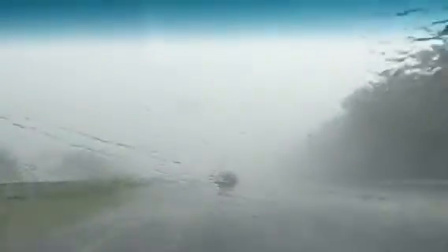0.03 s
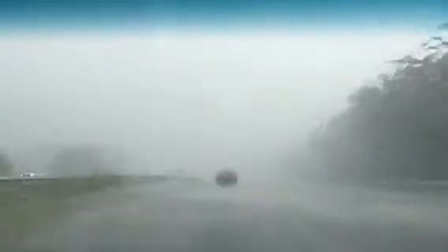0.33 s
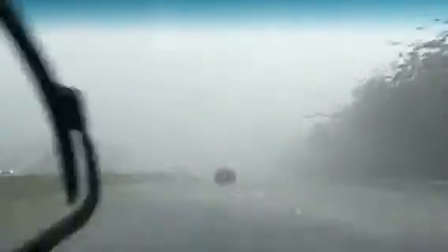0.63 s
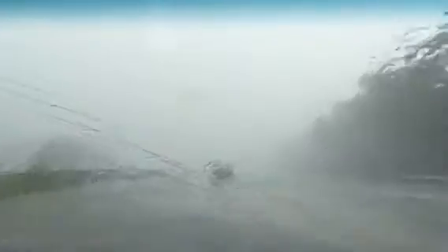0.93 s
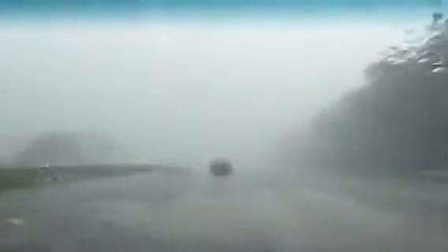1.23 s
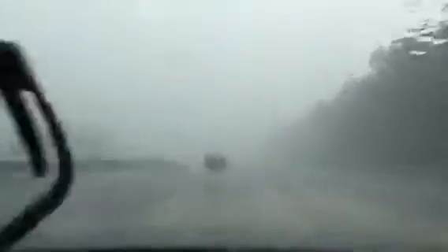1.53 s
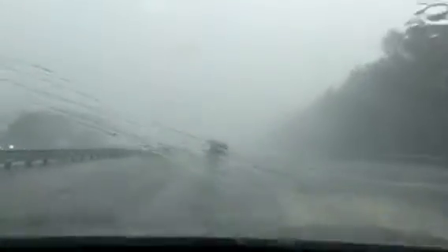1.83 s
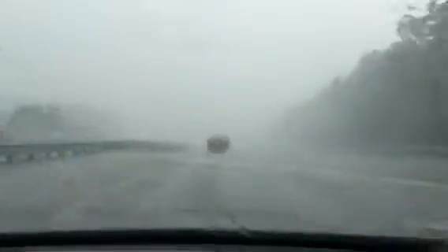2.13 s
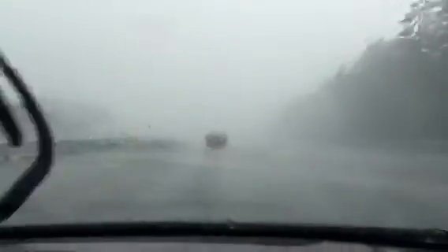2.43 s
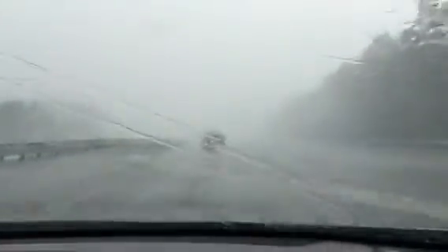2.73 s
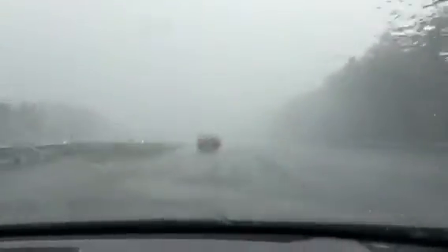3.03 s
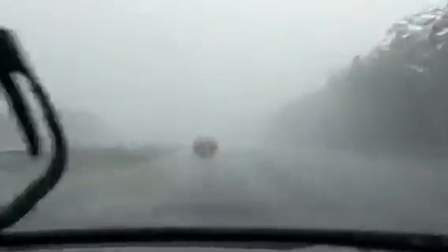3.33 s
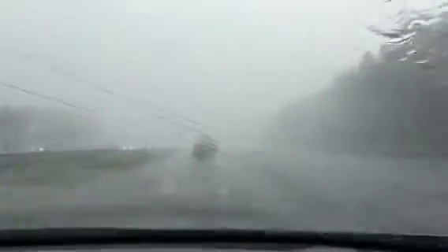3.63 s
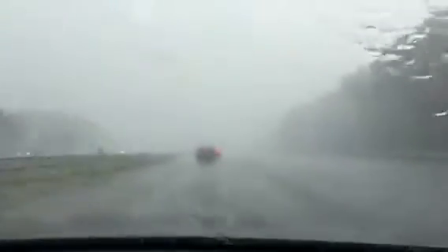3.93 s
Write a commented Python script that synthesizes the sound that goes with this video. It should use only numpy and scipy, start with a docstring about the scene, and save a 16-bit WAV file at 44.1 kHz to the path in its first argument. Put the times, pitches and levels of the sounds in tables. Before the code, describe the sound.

Hailstones and heavy rain strike a car, heard from inside over low tyre rumble.

```python
"""Inside a car driving through a hailstorm. From the start, fine rain patters over a wash of spray and
the road booms in the cabin. Hard stones crack on the windscreen, thickest in the first second, while
slush and heavy drops splatter on the glass and set the roof ringing. Bumps in the road thump between
1.2 and 1.5 s, a few tiny pellets tick from 2 to 2.7 s, and two more thumps come just before the end."""
import sys
import numpy as np
from scipy import signal
from scipy.io import wavfile

SR = 44100
rng = np.random.default_rng(int(sys.argv[2]) if len(sys.argv) > 2 else 0)


def transcribe(u):
    """Save the signal u as a 16-bit wav file named by the first command-line argument.

    u: samples, shape (n,) or (channels, n), limited to [-1, 1]; the rate is SR.
    q: integer samples, one column per channel.
    """
    v = np.clip(np.atleast_2d(u).T, -1, 1)
    q = np.round(v * 32767).astype(np.int16)
    wavfile.write(sys.argv[1], SR, q)


N = 176400
AGE = np.arange(SR // 3) / SR  # seconds since an impact
EDGES = np.geomspace(20, 17000, 27)  # filter bank, Hz
CENTRES = np.sqrt(EDGES[1:] * EDGES[:-1])
BANK = [signal.butter(2, band, "band", fs=SR, output="sos") for band in zip(EDGES, EDGES[1:])]

# bright tick of droplets and pellets on glass: pitch_hz, density_db
TICK_SPECTRUM = [(2000, -2), (4000, 9), (6000, 3), (9000, -1), (10500, -4), (12000, -5), (15000, -9)]
TICK_T60_S = 0.02


def from_db(db):
    """Decibels to gain."""
    return 10 ** (np.asarray(db) / 20)


def rms_one(x):
    """Scale to rms 1."""
    return x / np.sqrt(np.mean(x ** 2) + 1e-20)


def in_time(rows):
    """Each column of an automation curve at every sample."""
    times, *columns = np.transpose(rows)
    return [np.interp(np.arange(N) / SR, times, column) for column in columns]


def at_hz(points, hz):
    """Read a curve on a log-frequency axis."""
    pitches, values = np.transpose(points)
    return np.interp(np.log(hz), np.log(pitches), values)


def dying(age, t60):
    """Hold at 1 until age 0, then fall 60 dB every t60 seconds."""
    return np.exp(-np.log(1000) * np.maximum(age, 0) / t60)


def add(out, start_s, x):
    """Mix x into out from start_s."""
    i = int(np.clip(start_s * SR, 0, N - 1))
    out[i:i + len(x)] += x[:N - i]


def drift(per_s):
    """Glide between random values of spread 1."""
    knots = rng.standard_normal(400)
    return np.interp(np.arange(N) / SR * per_s, np.arange(len(knots)), knots)


def resonate(x, hz, t60):
    """A resonance with gain 1 at its peak."""
    radius = dying(1 / SR, t60)
    feedback = [1, -2 * radius * np.cos(2 * np.pi * hz / SR), radius ** 2]
    return signal.lfilter(np.array([1, 0, -1]) * (1 - radius ** 2) / 2, feedback, x)


def band_gains(spectrum):
    """Band gains that give white noise this spectrum at about the same power."""
    gains = from_db(at_hz(spectrum, CENTRES))
    return gains / np.sqrt(np.sum(gains ** 2 * np.diff(EDGES)) * 2 / SR)


def coloured(drives, gains):
    """Sum of the bands, each fed by its own drive."""
    return sum(gain * signal.sosfilt(sos, x + 1e-18) for sos, gain, x in zip(BANK, gains, drives))


def noise(spectrum, envelope=1):
    """Shaped noise at rms 1; neighbouring bands are unrelated."""
    white = rng.standard_normal((2, N)) * envelope
    return rms_one(coloured([white[k % 2] for k in range(len(BANK))], band_gains(spectrum)))


def grains(per_s, spread_db, size):
    """Random clicks of uneven strength."""
    clicks = rng.random(size) < per_s / SR
    return clicks * from_db(spread_db * np.minimum(rng.exponential(1, size), 4))


def patter(spectrum, per_s, spread_db, t60):
    """Random drops, each a short dying burst of noise; rms 1."""
    energy = grains(per_s, spread_db, N) ** 2 + 1e-18
    power = signal.lfilter([1], [1, -dying(2 / SR, t60)], energy)
    return noise(spectrum, np.sqrt(power))


def rain():
    """Drops and fine droplets tick over the hiss of rain on glass and the duller wash of road spray."""
    # fader rides for drops with hiss, and for spray: time_s, treble_db, middle_db
    wash_ride = [(0.0, -33.5, -28.5), (0.38, -38, -32.5), (0.54, -36, -30.5), (1.05, -31.5, -31),
                 (1.3, -36.5, -34.5), (1.51, -32, -35), (1.92, -35.5, -33), (2.09, -38.5, -37.5),
                 (2.3, -32.5, -34), (2.6, -36.5, -34.5), (2.92, -34, -34), (3.09, -32, -33),
                 (3.27, -35.5, -31), (3.45, -42.5, -35), (3.74, -39, -34.5), (4.0, -39.5, -36)]
    # fader ride for the finest droplets: time_s, level_db
    fizz_ride = [(0.0, -39), (0.11, -38), (0.33, -49), (0.66, -42.5), (0.97, -41.5), (1.26, -44.5),
                 (1.8, -40), (2.15, -46), (2.36, -39.5), (2.58, -50), (2.87, -42), (3.27, -36), (3.44, -43),
                 (3.62, -53), (4.0, -50)]
    # tone of small drops: pitch_hz, density_db
    drop_spectrum = [(400, -14), (1200, 14), (3300, 4.5), (6000, -2), (9000, -35)]
    # tone of rain on glass: pitch_hz, density_db
    hiss_spectrum = [(1500, 5.5), (3200, 10), (4500, -0.5), (6500, -1), (8500, -20)]
    # tone of road spray: pitch_hz, density_db
    spray_spectrum = [(220, 2.5), (365, 7), (500, -1), (900, -4.5), (1400, -5), (2000, -14.5), (3500, -52)]
    fizz_flutter_db, hiss_flutter_db = 2, 4
    treble_db, middle_db = in_time(wash_ride)
    fizz_db, = in_time(fizz_ride)
    drops = from_db(-4.5) * patter(drop_spectrum, per_s=110, spread_db=4, t60=0.02)
    fizz_gain = from_db(fizz_db + fizz_flutter_db * drift(per_s=25.16))
    fizz = fizz_gain * patter(TICK_SPECTRUM, per_s=450, spread_db=3, t60=TICK_T60_S)
    hiss = from_db(-1.5 + hiss_flutter_db * drift(per_s=45)) * noise(hiss_spectrum)
    spray = from_db(middle_db + 0.5) * noise(spray_spectrum)
    return from_db(treble_db) * (drops + hiss) + fizz + spray


def road():
    """The tyres rumble, two cabin modes boom and bumps in the road land as low thumps."""
    # fader ride for rumble and boom: time_s, level_db
    road_ride = [(0.0, -21), (0.44, -29.5), (0.95, -20.5), (1.25, -21), (1.4, -21.5), (1.56, -24.5),
                 (1.68, -26), (3.62, -23.5), (3.79, -27), (3.88, -21.5), (4.0, -26.5)]
    # tone of the tyres: pitch_hz, density_db
    tyre_spectrum = [(24, -32), (40, 0.5), (60, 1.5), (120, -1), (160, -9.5), (210, -18.5), (300, -53.5)]
    # cabin resonances, each passed twice: pitch_hz, level_db, t60_per_pass_s
    cabin_modes = [(92.8, -5.5, 0.13), (121.1, -6, 0.11)]
    # bumps in the road: start_s, level_db, pitch_hz, rise_s
    thumps = [(1.244, -11, 109, 0.023), (1.447, -7, 87, 0.007), (1.495, -11, 66, 0.014),
              (1.527, -9.5, 99, 0.01), (3.813, -9, 89, 0.009), (3.854, -10, 88, 0.0063)]
    level_db, = in_time(road_ride)
    boom = np.zeros(N)
    for hz, db, t60 in cabin_modes:
        first_pass = resonate(rng.standard_normal(N), hz, t60)
        boom += from_db(db) * rms_one(resonate(first_pass, hz, t60))
    rumble = from_db(-1.5) * noise(tyre_spectrum)
    out = from_db(level_db) * (rumble + boom)
    for start_s, db, hz, rise_s in thumps:
        swell = (AGE / rise_s * np.exp(1 - AGE / rise_s)) ** 2
        add(out, start_s, from_db(db) * swell * np.sin(2 * np.pi * hz * AGE))
    return out


def fragments():
    """Two unrelated showers of tiny contacts as a piece of ice breaks up."""
    shape = (2, len(AGE))
    return rms_one(grains(per_s=6000, spread_db=4.5, size=shape) * rng.choice([-1, 1], shape))


def impact_colour(spectrum, body_db, top_db):
    """Band gains of one impact, with its own bass and treble shelves."""
    low_shelf_db = at_hz([(1540, body_db), (3200, 0)], CENTRES)
    high_shelf_db = at_hz([(4440, 0), (9400, top_db)], CENTRES)
    return band_gains(spectrum) * from_db(low_shelf_db + high_shelf_db)


def struck(modes):
    """A panel's modes ring; strength and pitch vary with the spot that is struck."""
    spread_db, pitch_spread = 2.5, 0.032
    ring = np.zeros(len(AGE))
    for k, (hz, db, t60) in enumerate(modes):
        gain = from_db(db + rng.normal(0, spread_db)) * (-1) ** k
        pitch_hz = hz * (1 + pitch_spread * rng.standard_normal())
        ring += gain * np.sin(2 * np.pi * pitch_hz * AGE) * dying(AGE, t60)
    return ring


def stones():
    """Each stone cracks, rings briefly at its own pitch, shakes the pane and leaves a cabin tail."""
    # hailstones on the windscreen: start_s, level_db, body_db, top_db, pitch_hz
    hits = [(.0055, -13, -4.5, 0, 4270), (0.0356, -6, -3, -1.5, 6080), (0.06, -20.5, -22, 12, 5540),
            (0.0836, -11.5, -3, -4, 2850), (.195, -15.5, 3.5, 4, 4600), (0.2005, -13, -26, 7, 3540),
            (0.3234, -19.5, -5, 11, 3840), (.372, -29.5, -8, 17, 6000), (.397, -5.5, -1, 1, 3030),
            (0.427, -8.5, 2, -1.5, 2640), (.476, -9.5, -7.5, 4, 3700), (.590, -10, 1, 5, 2550),
            (0.6584, -9.5, -1.5, 8.5, 3480), (0.7062, -7, -7.5, 4, 3530), (.763, -10.5, 1.5, 5, 4240),
            (0.932, -14, 2, 10, 4460), (1.357, -9, -0.5, 7, 5600), (1.377, -22, 1, 5, 5540),
            (1.521, -17, -6, 4, 3880), (1.549, -6.5, -0.5, 5, 2120), (1.6783, -17, 4.5, 5, 3670),
            (1.775, -35, -8, -18, 3150), (2.4083, -10, -10, 10, 3280), (2.548, -26.5, -21, 4, 5460),
            (2.752, -8, 2.5, 2.5, 2830), (2.9736, -10.5, -7, 2.5, 3300), (3.009, -22, -11, -16, 3300),
            (3.066, -15.5, -26, -20, 5370), (3.111, -18.5, -0.5, 9.5, 6500), (3.1241, -18, -3, 3, 2430),
            (3.198, -37, 5, -13, 3480), (3.31, -16, 8, 4, 1240), (3.331, -30, -1, 10, 4530),
            (3.445, -5.5, -1.5, 4.5, 3770), (3.771, -24, -6, 0, 5800), (3.805, -18, -4, 0.5, 3400)]
    # tone of struck glass: pitch_hz, density_db
    glass_spectrum = [(100, -2), (600, 0.5), (1500, 3.5), (3800, 5.5), (6100, -1.5), (7700, -8.5),
                      (11000, -19.5), (15000, -22)]
    # windscreen resonances: pitch_hz, level_db, t60_s
    pane_modes = [(116, -21, 0.13), (304, -15.5, 0.062), (363.4, -11.5, 0.089), (570, -8, 0.017),
                  (1397, -14, 0.039)]
    # decay of the crack: pitch_hz, t60_s
    crack_decay = [(300, 0.018), (2000, 0.038), (5000, 0.029), (13000, 0.061)]
    # cabin tail against the crack: pitch_hz, level_db
    tail_level = [(300, -2.5), (2000, -4.5), (6000, -7), (13000, 0)]
    # decay of the cabin tail: pitch_hz, t60_s
    tail_decay = [(200, 0.32), (1000, 0.11), (4000, 0.07), (14000, 0.054)]
    trim_db, hold_s, bright_hz = -3.5, 0.0006, 9200
    bands_hz = CENTRES[:, None]
    holds_s = hold_s / (1 + (bands_hz / bright_hz) ** 2)  # the top starts to die almost at once
    cracks = dying(AGE - holds_s, at_hz(crack_decay, bands_hz))
    tails = from_db(at_hz(tail_level, bands_hz)) * dying(AGE, at_hz(tail_decay, bands_hz))
    # the first contact snaps, brighter and shorter than the crack, and sets off a clean ping
    snaps = from_db(0.5) * np.minimum(bands_hz / bright_hz, 1) * dying(AGE, t60=0.007)
    envelopes = np.hypot(cracks, tails) + snaps
    out = np.zeros(N)
    for start_s, db, body_db, top_db, hz in hits:
        shower = fragments()
        drives = [shower[k % 2] * envelope for k, envelope in enumerate(envelopes)]
        crack = coloured(drives, impact_colour(glass_spectrum, body_db, top_db))
        contact = dying(AGE - hold_s, at_hz(crack_decay, hz))
        ring = resonate(rng.standard_normal(len(AGE)) * contact, hz, t60=0.0095)
        ring = from_db(-4.5) * rms_one(ring) * np.sqrt(np.mean(contact ** 2))
        ping = from_db(1.5) * np.sin(2 * np.pi * hz * AGE) * dying(AGE, t60=0.011)
        pane = from_db(body_db / 2) * struck(pane_modes)
        add(out, start_s, from_db(db + trim_db) * (crack + ring + ping + pane))
    return out


def splats():
    """Slush and big drops swell and spray out; the roof rings and answers later and longer low down."""
    # soft hits: start_s, treble_rise_s, treble_t60_s, level_db, body_db, top_db, roof_db
    hits = [(.125, .01, 0.19, -32, 4.5, 6.5, -42), (0.265, 0.015, 0.21, -27, 4.5, 2, -10.5),
            (.388, .012, 0.076, -26, 11, 8, -11.5), (.505, 0.0032, 0.16, -28, 11.5, -6, -6.5),
            (0.5753, 0.0158, 0.11, -21, 7, -2, -24), (.795, 0.0075, 0.17, -27.5, -1, -2, -44),
            (0.836, 0.0083, 0.091, -29.5, -21, 9, -27), (0.882, 0.0064, 0.059, -17.5, -0.5, -2, -17),
            (1.046, 0.01, 0.12, -20.5, 4, 3, -7.5), (1.103, 0.011, 0.085, -18.5, -10, 1, -5),
            (1.121, 0.0055, 0.15, -28, 16, -1, -6), (1.222, .01, 0.073, -34.5, 11, 9.5, -26),
            (1.285, 0.0075, 0.052, -29, -1, -11, -32), (1.547, 0.0029, 0.079, -33, 13, 4, -9),
            (1.97, 0.003, 0.12, -31.5, 15, 5, -25), (1.983, .009, 0.071, -20.5, 3.5, -1.5, -31),
            (2.077, 0.0052, .14, -26, 6, -1.5, -31), (2.718, 0.0059, 0.079, -21.5, -3, -5, -18),
            (2.783, 0.00197, 0.092, -22, 11.5, 4.5, -5), (2.796, 0.0075, 0.1, -22, 6.5, 3, -16),
            (2.907, 0.0068, 0.052, -17.5, -15, -6, -40), (3.06, 0.0075, 0.33, -27.5, 1, -5, -25),
            (3.193, 0.0062, 0.07, -21.5, 2.5, -3, -20), (3.4, 0.0033, 0.11, -21.5, 9.5, -3, -22),
            (3.708, 0.0048, 0.087, -30.5, 13.5, 6, -18), (3.862, 0.004, 0.021, -26.5, -7, -3, -39),
            (3.942, 0.0087, 0.11, -27.5, -12, -4.5, -24)]
    # tone of bursting slush: pitch_hz, density_db
    slush_spectrum = [(100, 2), (350, 3.5), (1500, 4), (3800, 3.5), (8000, -3), (11000, -11), (15000, -11)]
    # roof resonances: pitch_hz, level_db, t60_s
    roof_modes = [(200, -15, 0.17), (287.8, -9, 0.14), (338, -12, 0.14), (369, -13.5, 0.27),
                  (590, -12, 0.1), (1312, -17, .08), (2400, -19, .07)]
    trim_db, roof_hz, roof_swell_s = 2, 600, 0.01
    rise_shape = 0.4  # below 1 a splat starts abruptly, then fills out
    stretch = 1 + 0.86 / (1 + (CENTRES[:, None] / roof_hz) ** 2)  # low bands move more slowly
    roof_swell = 1 - np.exp(-AGE / roof_swell_s)  # the ring takes a moment to spread over the roof
    out = np.zeros(N)
    for start_s, rise_s, t60, db, body_db, top_db, roof_db in hits:
        shower = fragments()
        attacks = np.minimum(AGE / (rise_s * stretch), 1) ** rise_shape
        envelopes = attacks * dying(AGE / stretch - rise_s, t60)
        drives = [shower[k % 2] * envelope for k, envelope in enumerate(envelopes)]
        splat = coloured(drives, impact_colour(slush_spectrum, body_db, top_db))
        add(out, start_s, from_db(db + trim_db) * splat)
        add(out, start_s + rise_s, from_db(roof_db) * roof_swell * struck(roof_modes))
    return out


def pellets():
    """Tiny ice pellets tick on the glass, one by one."""
    # single pellets among the patter: start_s, level_db
    ticks = [(2.066, -43), (2.196, -27.5), (2.338, -23.5), (2.668, -26), (2.681, -30)]
    envelope = np.zeros(N)
    for start_s, db in ticks:
        add(envelope, start_s, from_db(db) * dying(AGE, TICK_T60_S))
    return envelope * noise(TICK_SPECTRUM)


def scene():
    """Impacts over a bed of rain and road, heard in mono from behind the windscreen."""
    return (stones() + splats() + pellets() + rain() + road())[None]


def record(dry):
    """The microphone loses the deepest bass and overloads on the hardest cracks; the top is cut."""
    low_cut_hz, high_cut_hz, ceiling = 29.6, 15300, 0.7
    thinned = signal.sosfilt(signal.butter(4, low_cut_hz, "high", fs=SR, output="sos"), dry)
    clipped = thinned / (1 + (thinned / ceiling) ** 6) ** (1 / 6)
    return signal.sosfilt(signal.ellip(12, .1, 80, high_cut_hz, fs=SR, output="sos"), clipped)


dry = scene()
out = record(dry)
transcribe(out)
```